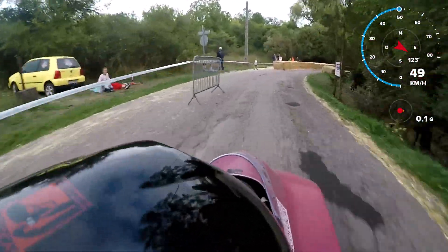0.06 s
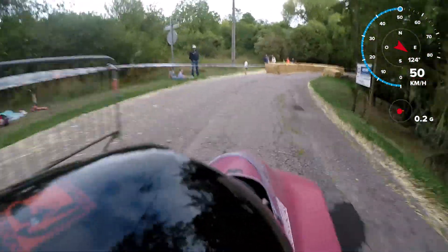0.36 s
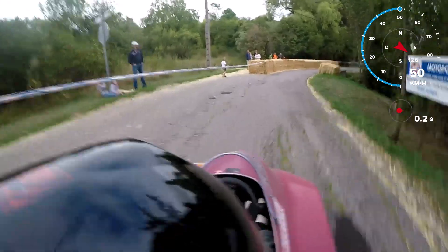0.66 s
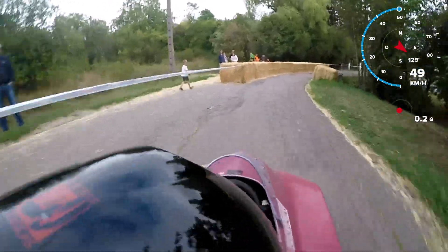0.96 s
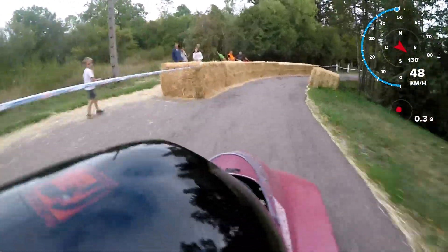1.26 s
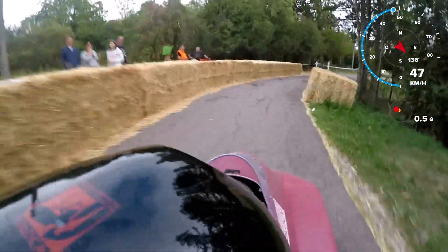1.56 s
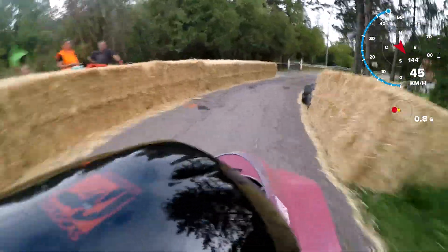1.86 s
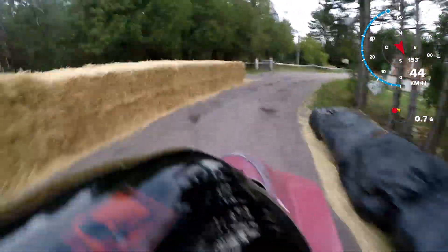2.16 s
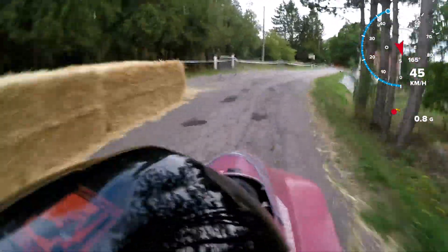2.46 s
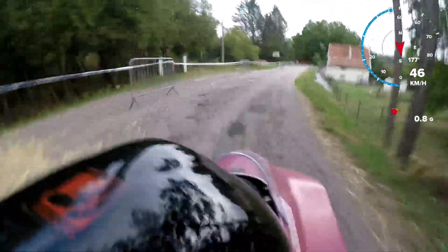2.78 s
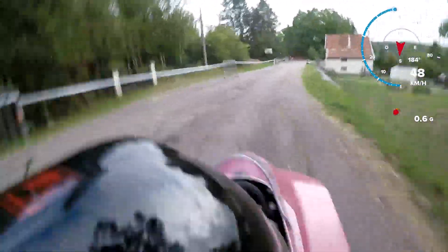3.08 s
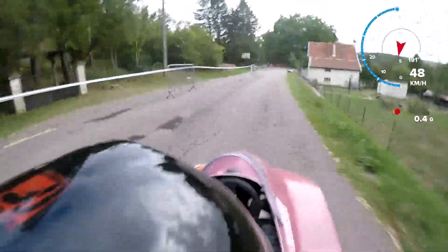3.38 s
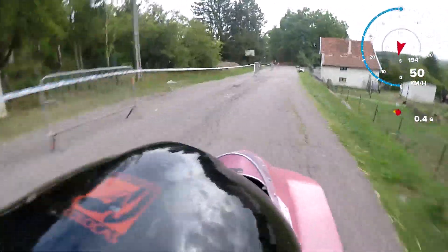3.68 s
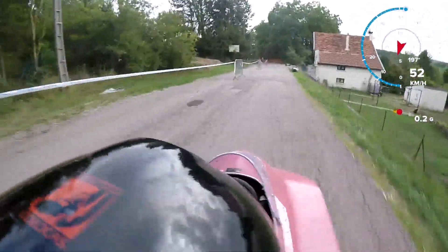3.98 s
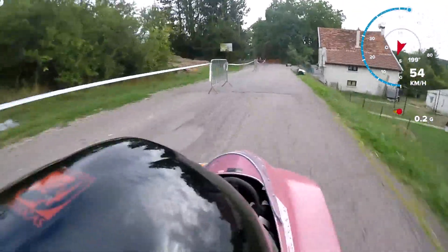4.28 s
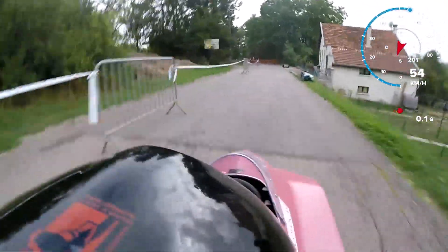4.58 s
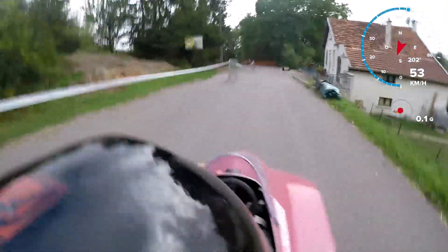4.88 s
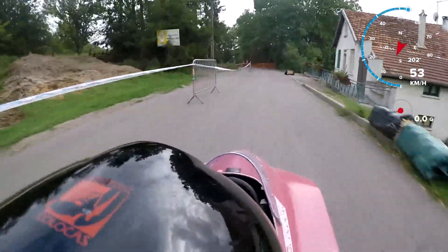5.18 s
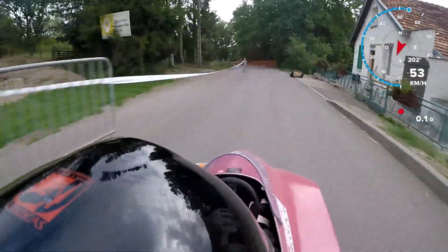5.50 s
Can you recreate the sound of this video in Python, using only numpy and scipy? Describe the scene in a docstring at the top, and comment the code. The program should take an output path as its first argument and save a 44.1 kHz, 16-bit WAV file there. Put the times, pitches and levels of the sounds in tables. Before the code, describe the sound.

Wind buffets a microphone mounted on a soapbox cart coasting fast down an asphalt road. The hollow shell booms and drums throughout, over a softer tyre roar and hiss. A wheel squeals faintly at the start, and grit ticks against the body. Loose joints knock and rattle, busiest in a bend midway, with dull thumps from road seams. The ride then smooths out, with one more hard knock near the end.

```python
"""Wind buffets a microphone on the shell of a soapbox cart coasting on asphalt at about 50 km/h.
The road shakes the hollow shell into a boom and drums its panels; seams thump.
Tyres roar, hiss and flick grit at the shell; a wheel squeals briefly at the start.
Loose chassis joints knock and rattle, most in the bend. A limiter ducks the peaks."""
import sys
import numpy as np
from scipy import signal
from scipy.fft import rfft, irfft, next_fast_len
from scipy.io import wavfile
from scipy.ndimage import uniform_filter1d, minimum_filter1d

SR = 44100
rng = np.random.default_rng(int(sys.argv[2]) if len(sys.argv) > 2 else 0)


def digitize_waveform(pressure):
    """Quantize a signal to 16-bit integers and store it at the path in sys.argv[1].

    Rows of a 2-D input are taken as channels; values are limited to [-1, 1].
    """
    field = np.atleast_2d(pressure).T
    bounded = np.clip(field, -1, 1)
    quanta = np.round(bounded * 32767).astype(np.int16)
    wavfile.write(sys.argv[1], SR, quanta)


N = 253134
TIME = np.arange(N) / SR

# cart speed, lowest in the bend: [t/s, v/(km/h)]
SPEED_KMH = [(0, 49), (.75, 50), (1.25, 48), (2.25, 44), (3.25, 48), (4.2, 53), (5.74, 53)]
# side load through the bend: [t/s, load/g]
SIDE_LOAD_G = [(0, .1), (1.25, .2), (1.75, .7), (2.75, .8), (3.25, .5), (4.0, .2), (5.74, .1)]
# tyre noise as the asphalt's coarseness varies: [t/s, roar/dB, hiss/dB]
ASPHALT = [(0.0, -49, -62), (0.46, -40.5, -58.5), (1.02, -44.5, -59.5), (2.05, -42.5, -55),
           (2.36, -48, -57), (2.64, -40.5, -51.5), (2.81, -48, -58), (3.07, -49, -61), (3.39, -47, -58.5),
           (3.87, -51, -60.5), (4.17, -45.5, -58), (4.81, -44, -57), (5.04, -47, -58.5), (5.74, -48.5, -59)]
# tread roar spectrum: [f/Hz, relative density/dB]
TREAD_SPECTRUM = [(400, -2), (900, 8.5), (1400, 5.5), (1850, 2.5), (2200, 1.5), (2600, -7), (3300, -10.5),
                  (4200, -17.5), (7000, -48.5)]
# tyre hiss spectrum: [f/Hz, relative density/dB]
HISS_SPECTRUM = [(2000, 3), (3300, 6.5), (4300, 2), (5400, 3), (6500, 2), (7600, -8.5), (9600, -13),
                 (11000, -26), (15000, -39)]
# largest stones hitting the shell: [t/s, relative peak/dB]
STONE_HITS = [(0.2753, -43), (0.3078, -36.5), (0.3361, -45), (0.374, -50), (0.398, -38), (0.4595, -45),
              (0.528, -40), (0.5586, -48), (0.5915, -41), (0.74, -38.5), (0.7866, -33), (0.827, -39),
              (0.9827, -48), (1.2645, -41), (1.3972, -42), (1.431, -41), (1.5758, -48), (1.6442, -38),
              (1.6905, -43), (1.7315, -41), (1.7474, -35), (1.9749, -41), (2.0058, -43), (2.0115, -40),
              (2.0495, -34), (2.073, -42), (2.1162, -41), (2.1237, -37), (2.154, -35.5), (2.2235, -36),
              (2.4302, -38), (2.4646, -37), (2.4783, -31), (2.5511, -41), (2.6304, -43), (2.6592, -40),
              (2.672, -38), (2.755, -42), (2.7625, -35), (2.8078, -38), (2.8978, -44), (3.1075, -37),
              (3.1555, -40), (3.262, -35), (3.2844, -45), (3.3233, -43), (3.3525, -39), (4.4487, -38.5),
              (4.8703, -34), (4.873, -45)]
# stones scraping a wheel arch: [t/s, peak/dB, decay/s]
ARCH_SCRAPES = [(2.1765, -46.5, 0.0074), (2.729, -39.5, 0.016)]
# spells of harder joint chatter: [centre/s, length/s, boost/dB]
RATTLE_SPELLS = [(.85, 0.14, 11), (1.2, 0.12, 8.5), (1.4, 0.11, 7), (1.7, 0.28, 4), (2.18, 0.22, 7.5),
                 (2.56, .14, 3), (2.7, 0.13, 10), (3.29, 0.12, 6.5)]
# joint knocks: [t/s, ring peak/dB, f/Hz, crack re ring/dB, contact/s]
JOINT_KNOCKS = [(0.035, -32.5, 1770, -27.5, .0005), (0.4912, -27.5, 1760, -29, 0.004),
                (0.656, -31, 1740, -15, .001), (0.794, -19, 1840, -26, 0.0022),
                (0.8337, -33, 1800, -22, .002), (1.145, -34, 1880, -17, 0.0017),
                (1.201, -31, 1740, -25, .002), (1.3313, -27.5, 1580, -29, .001),
                (1.5959, -26, 1780, -30, .001), (1.7405, -21.5, 1759, -18, 0.0064),
                (2.0574, -15.5, 1800, -14.5, 0.0024), (2.065, -31, 1460, -22, .002),
                (2.0805, -26, 1620, -17, .002), (2.104, -26, 1670, -17, .001),
                (2.1123, -21, 1530, -22, .001), (2.1365, -27, 1910, -9, .001),
                (2.1573, -20, 1670, -24, .005), (2.1865, -32, 1670, -23, 0.0018),
                (2.4272, -26, 1697, -14, 0.0042), (2.4773, -21, 1717, -19, 0.0035),
                (2.519, -33, 1780, -13, .002), (2.549, -26, 1820, -13, 0.0017),
                (2.604, -27, 1762, -17, .003), (2.6216, -31, 1800, -21, .002),
                (2.6315, -23.5, 1648, -14, 0.0018), (2.6393, -26, 1730, -16, 0.00089),
                (2.686, -29, 1810, -20, .003), (2.7437, -19.5, 1740, -28, 0.0034),
                (3.099, -23.5, 1700, -30, .002), (3.1058, -24, 1810, -25, 0.0029),
                (3.508, -31, 1680, -38, 0.0018), (4.865, -21.5, 1449, -24, 0.0019),
                (4.8694, -12.5, 1685, -19.5, 0.003), (4.8782, -31, 1742, -21, .001),
                (4.8955, -31, 1650, -20, .002), (4.951, -30, 1540, -25, .002),
                (5.0245, -24.5, 1450, -42, .002), (5.322, -32, 1708, -28, .001)]
# chassis modes: [f/knock f, relative level/dB, t60/s]
CHASSIS_MODES = [(0.5, -9, 0.019), (0.76, -5, 0.0091), (0.999, 1, 0.016), (1.14, -8.5, 0.022),
                 (1.42, -22.5, 0.011), (1.899, -21.5, 0.008)]
# wheels crossing seams: [t/s, relative peak/dB]
SEAM_HITS = [(1.2, -20), (1.334, -23), (2.112, -18.5), (2.602, -38), (2.631, -18.5), (3.103, -20.5),
             (3.532, -26), (4.868, -24)]
# shell boom pitch, wavering irregularly between about 80 and 135 Hz: [t/s, f/Hz]
BOOM_PITCH_HZ = [(0, 105.5), (.45, 91.7), (.7, 116.9), (1.0, 91.6), (1.35, 94.3), (1.52, 118),
                 (1.75, 106.7), (1.95, 113), (2.1, 98), (2.4, 113.2), (2.52, 104), (3.0, 104.5),
                 (3.3, 117.7), (3.48, 97.5), (3.72, 134), (3.88, 106), (4.2, 86.67), (4.8, 100.3),
                 (5.05, 82), (5.6, 120.9)]
# shell panel modes: [f/Hz, width/Hz, relative level/dB]
PANEL_MODES = [(153.5, 28, 3.5), (186.6, 13, 5), (236, 29, 4.5), (297.7, 35, -4.5), (434, 130, -18),
               (776, 19, -17)]
# uneven stretches of road: [centre/s, length/s, boom/dB, panels/dB]
ROUGH_PATCHES = [(0.45, 0.55, 2, 2.5), (1.35, 0.4, 0, 5.5), (1.72, 0.23, 2, 6.5), (2.02, 0.2, 3, 1),
                 (2.15, 0.2, 1.5, 3), (2.5, 0.14, 3, 5.5), (2.61, 0.092, 3.5, 7.5), (3.26, 0.11, 1.5, 4),
                 (3.66, 0.33, -3, 4), (3.83, 0.13, 2, -4), (4.02, 0.26, -2.5, 4), (4.875, 0.19, 5, 1.5)]
# strongest eddies on the microphone: [t/s, peak/dB]
EDDY_SLAPS = [(0.015, -23), (0.091, -19), (0.1416, -19), (0.19, -21), (0.2279, -22), (0.3387, -24),
              (0.437, -19), (0.6026, -22.5), (0.7403, -21.5), (0.7955, -37), (0.9322, -21), (1.19, -26),
              (1.4472, -24.5), (1.462, -24), (1.7261, -21.5), (2.0493, -21), (2.6315, -27), (3.0, -30),
              (3.8552, -22.5), (4.209, -33), (4.38, -18), (4.4194, -27), (4.4281, -17.5), (4.8082, -17.5),
              (5.219, -25), (5.2397, -19), (5.4208, -24), (5.513, -27), (5.5684, -22), (5.598, -20)]
# gusts and slack moments: [centre/s, length/s, buffet/dB, rush/dB]
GUST_SWELLS = [(.18, 0.43, 2, 2.5), (.63, 0.082, -1, -8), (0.775, 0.45, 3, 1.5), (1.1, 0.079, -3, -6),
               (1.42, 0.16, 0, 4), (1.6, 0.12, 7, -4.5), (1.85, 0.16, 0.5, -3), (2.07, 0.43, -2, 5.5),
               (2.19, 0.26, 3.5, 1.5), (2.6, .6, 0, 0.5), (3.1, .45, -4.5, 1.5), (3.36, 0.11, 1.5, 10),
               (3.56, 0.24, -5.5, 0.5), (3.97, 0.088, -2, 2.5), (4.38, 0.24, 3.5, 3.5),
               (4.65, 0.36, 3, 0.5), (5.0, 0.28, 3, -4), (5.47, 0.7, -0.5, 2)]
# large-eddy spectrum: [f/Hz, relative density/dB]
BUFFET_SPECTRUM = [(12, -12.5), (22, -17), (32, 6.5), (45, -7.5), (66, 3), (92, -8.5), (160, -14.5),
                   (320, -35.5)]
# small-eddy spectrum: [f/Hz, relative density/dB]
RUSH_SPECTRUM = [(60, -14.5), (150, 7), (290, 2.5), (400, -3), (650, -7.5), (1000, -17), (1600, -22.5),
                 (2500, -32), (4000, -42.5), (6300, -58), (9000, -80.5)]


def from_db(db):
    """Decibels to gain."""
    return 10 ** (np.asarray(db) / 20)


def unit_rms(x):
    """Scale to rms 1."""
    return x / np.sqrt(np.mean(x ** 2) + 1e-20)


def curve(rows, column=1):
    """One column, interpolated linearly over time."""
    table = np.transpose(rows)
    return np.interp(TIME, table[0], table[column])


def swells_db(rows):
    """Raised-cosine swells; one curve per dB column."""
    return sum(np.outer(dbs, np.cos(np.pi * np.clip((TIME - centre_s) / length_s, -.5, .5)) ** 2)
               for centre_s, length_s, *dbs in rows)


def coarseness_db():
    """Asphalt roar level about its mean."""
    roar_db = curve(ASPHALT)
    return roar_db - roar_db.mean()


def white():
    """White noise."""
    return rng.standard_normal(N)


def burst(t, decay_s):
    """Exponentially decaying noise."""
    return rng.standard_normal(len(t)) * np.exp(-t / decay_s)


def drift(rate_hz):
    """Slow random curve, rms 1."""
    step, warmup = 20, 2000
    pole = np.exp(-2 * np.pi * rate_hz * step / SR)
    noise = rng.standard_normal(N // step + warmup + 2)
    slow = signal.lfilter([1], [1, -2 * pole, pole * pole], noise)[warmup:]
    return np.interp(np.arange(N) / step, np.arange(len(slow)), unit_rms(slow))


def grains(per_s, spread_db):
    """Random clicks, mostly small."""
    sizes = from_db(spread_db * np.minimum(rng.exponential(1, N), 4))
    return (rng.random(N) < per_s / SR) * sizes * rng.choice([-1, 1], N)


def band(x, low_hz, high_hz):
    """Butterworth band-pass."""
    return signal.sosfilt(signal.butter(2, [low_hz, high_hz], "band", fs=SR, output="sos"), x)


def muffled(x, edge_hz=9500):
    """Steep low-pass."""
    return signal.sosfilt(signal.butter(10, edge_hz, fs=SR, output="sos"), x)


def resonance(x, hz, width_hz):
    """Two-pole resonator, peak gain 1."""
    r = np.exp(-np.pi * width_hz / SR)
    feedback = [1, -2 * r * np.cos(2 * np.pi * hz / SR), r * r]
    return signal.lfilter(np.array([1, 0, -1]) * (1 - r * r) / 2, feedback, x + 1e-18)


def coloured(x, spectrum):
    """Impose a spectrum, rolled off past its ends; rms 1."""
    hz, db = np.transpose(spectrum)
    size = next_fast_len(N + SR // 2)
    bins_hz = np.maximum(np.arange(size // 2 + 1) * SR / size, 1)
    skirts = np.minimum(bins_hz / hz[0], 1) * np.minimum(hz[-1] / bins_hz, 1) ** 2
    shape = from_db(np.interp(np.log(bins_hz), np.log(hz), db))
    return unit_rms(irfft(rfft(x, size) * skirts * shape, size)[:N])


def steadied(x, span_s):
    """Level out swells slower than the span; rms about 1."""
    size = int(span_s * SR)
    return x / np.sqrt(uniform_filter1d(uniform_filter1d(x * x, size), size) + 1e-12)


def add(track, at_s, sound, peak_db):
    """Mix in a short sound at a given peak."""
    start = round(at_s * SR)
    track[start:start + len(sound)] += (from_db(peak_db) * sound / np.abs(sound).max())[:N - start]


def squeal(level_db=-56.5, hold_s=0.2, release_db_per_s=597, upper_hz=3265, lower_hz=3020):
    """Something rubs a wheel: a rough, wavering note over a weaker, lower one."""
    def note(hz, waver_hz=30):
        roughness = 1 + drift(110)
        phase = 2 * np.pi * np.cumsum(hz + waver_hz * drift(30)) / SR
        return steadied(roughness * np.sin(phase), span_s=0.033)

    gain = from_db(level_db - release_db_per_s * np.clip(TIME - hold_s, 0, 1))
    return gain * (note(upper_hz) + from_db(-6) * note(lower_hz))


def clink(at_s=3.374, peak_db=-33, hz=3800):
    """A small metal part taps once."""
    out, t = np.zeros(N), TIME[:SR // 20]
    ring = resonance(burst(t, decay_s=0.003), hz, width_hz=900)
    add(out, at_s, band(ring, 2305, 5970), peak_db)
    return out


def skitters():
    """Stones caught by a tyre scrape the arch with a bright chirr."""
    out, t = np.zeros(N), TIME[:SR // 10]
    for at_s, peak_db, decay_s in ARCH_SCRAPES:
        scrape = resonance(burst(t, decay_s), hz=6900, width_hz=1200)
        add(out, at_s, muffled(band(scrape, 4500, 12000)), peak_db)
    return out


def grit(pebbles_per_s=14, fresh_asphalt_s=4.5, tick_hz=5550, scatter_hz=400):
    """Grit and stones tick on the shell; on fresh asphalt the spray drops and random pebbles stop."""
    load_g, fresh = curve(SIDE_LOAD_G), TIME > fresh_asphalt_s
    spray = resonance(grains(per_s=120, spread_db=4.5), hz=5400, width_hz=1800)
    spray_db = curve(ASPHALT, column=2) - 12.5 + load_g - 9 * fresh
    out = from_db(spray_db) * unit_rms(muffled(band(spray, 4200, 8200)))
    flicked = (rng.random(N) < pebbles_per_s / SR) & ~fresh
    pebble_db = -52.5 + 4 * load_g + 0.55 * coarseness_db() + rng.uniform(-1.1, 1, N)
    for at_s, level_db in [*STONE_HITS, *zip(TIME[flicked], pebble_db[flicked])]:
        contact = burst(TIME[:SR // 20], decay_s=0.0009)
        ring = resonance(contact, rng.normal(tick_hz, scatter_hz), width_hz=1300)
        tick = band(ring + 0.23 * contact, 2300, 6900)
        add(out, at_s, muffled(tick), level_db - 1)
    return out


def tyres(judder_db=0.78, hiss_db_per_g=-0.5):
    """Tread roars and hisses as the wheels judder; side load trims the hiss slightly."""
    judder = from_db(judder_db * drift(39))
    roar = coloured(white() * judder, TREAD_SPECTRUM)
    hiss = coloured(white() * judder, HISS_SPECTRUM)
    roar_db = curve(ASPHALT) - 0.5
    hiss_db = curve(ASPHALT, column=2) + 1.6 + hiss_db_per_g * curve(SIDE_LOAD_G)
    return from_db(roar_db) * roar + from_db(hiss_db) * hiss


def rattle(db_per_g=4.5, modes_hz=(1730, 1900, 2060)):
    """The road keeps loose joints chattering, more under side load."""
    chatter = sum(resonance(grains(per_s=70, spread_db=0.7), hz, width_hz=260) for hz in modes_hz)
    level_db = curve(ASPHALT) - 10.5 + db_per_g * curve(SIDE_LOAD_G) + swells_db(RATTLE_SPELLS)[0]
    return from_db(level_db) * unit_rms(band(chatter, 1450, 2250))


def rebounds(threshold_db=-20, re_knock_db=-25.5, decay_s=0.042):
    """Joints rebound after a hard knock in a quick, dying rattle."""
    def chatter(*modes_hz):
        return sum(resonance(grains(per_s=99, spread_db=2), hz, width_hz=300) for hz in modes_hz)

    envelope = sum(from_db(db + re_knock_db) * (TIME > at_s) * np.exp(-np.abs(TIME - at_s) / decay_s)
                   for at_s, db, *_ in JOINT_KNOCKS if db > threshold_db)
    joints = chatter(1300, 1680, 2050) + from_db(-8) * chatter(2450, 3200)
    return envelope * unit_rms(band(joints, 1000, 3600))


def knocks(seat_s=0.00014, scatter_db=0.94):
    """A loose joint seats with a grate and a crack; its ring holds during contact, then dies."""
    out, t = np.zeros(N), TIME[:SR // 10]
    for at_s, peak_db, hz, crack_db, contact_s in JOINT_KNOCKS:
        released_s = np.maximum(t - contact_s, 0)
        ring = np.zeros(len(t))
        for ratio, mode_db, t60_s in CHASSIS_MODES:
            envelope = from_db(rng.normal(mode_db, scatter_db) - 60 * released_s / t60_s)
            ring += envelope * np.sin(2 * np.pi * (hz * ratio * t + rng.random()))
        grate = unit_rms(band(rng.standard_normal(len(t)), 700, 2200)) * np.exp(-t / 0.006)
        attack = (1 - np.exp(-t / seat_s)) ** 2
        add(out, at_s, (ring + 0.29 * grate) * attack, peak_db)
        crack = band(burst(t, decay_s=0.0037), 3300, 6500)
        add(out, at_s, muffled(band(crack, 2200, 8100)), peak_db + crack_db)
    return out


def seams(gain_db=3):
    """Wheels thump dully over road seams."""
    out, t = np.zeros(N), TIME[:SR // 10]
    for at_s, level_db in SEAM_HITS:
        add(out, at_s, band(burst(t, decay_s=0.02), 130, 420), level_db + gain_db)
    return out


def shell(wander_hz=4, jolt_hz=24, steady_above_g=0.45, steady_per_g=2.7):
    """The rough road keeps the hollow shell booming and its panels drumming."""
    load_g = curve(SIDE_LOAD_G)
    patch_boom_db, patch_panel_db = swells_db(ROUGH_PATCHES)
    boom_db = -23 + patch_boom_db + 0.1 * coarseness_db() + 2 * load_g
    panel_db = -31 + patch_panel_db + 0.55 * coarseness_db() + 2 * drift(7)
    phase = 2 * np.pi * np.cumsum(curve(BOOM_PITCH_HZ) + wander_hz * drift(8.1)) / SR
    # jolts scatter amplitude and phase; side load holds a steadier hum
    hum = steady_per_g * np.maximum(load_g - steady_above_g, 0)
    swing = (hum + drift(jolt_hz)) * np.cos(phase) + drift(jolt_hz) * np.sin(phase)
    boom = steadied(swing, span_s=0.035)
    modes = sum(from_db(db) * resonance(white(), hz, width_hz) for hz, width_hz, db in PANEL_MODES)
    panels = steadied(band(modes, 130, 800), span_s=0.18)
    return from_db(boom_db) * boom + from_db(panel_db) * panels


def slaps(centre_hz=680, attack_s=0.0003, decay_s=0.0015):
    """Single eddies break on the microphone: dull pops of about two cycles."""
    out, t = np.zeros(N), TIME[:SR // 20]
    envelope = (1 - np.exp(-t / attack_s)) * np.exp(-t / decay_s)
    for at_s, peak_db in EDDY_SLAPS:
        hz = centre_hz * np.exp(0.14 * rng.standard_normal())
        add(out, at_s, np.sin(2 * np.pi * hz * t) * envelope, peak_db)
    return out


def wind(cruise_kmh=50, rush_db_per_kmh=0.33, lull_start_s=2.74, lull_end_s=3.544, lull_fade_s=0.19):
    """Large eddies buffet the microphone; small ones ride on them in bursts of rush."""
    buffet = steadied(coloured(white(), BUFFET_SPECTRUM), span_s=0.12)
    bursts_db = np.minimum(4 * drift(70) + buffet, 4)
    rush = steadied(coloured(white() * from_db(bursts_db), RUSH_SPECTRUM), span_s=0.093)
    rush /= np.std(band(rush, 340, 1100))  # level refers to the midrange
    gust_buffet_db, gust_rush_db = swells_db(GUST_SWELLS)
    speed_db = rush_db_per_kmh * (curve(SPEED_KMH) - cruise_kmh)
    # the rush dips on leaving the bend
    lull = np.clip(np.minimum(TIME - lull_start_s, lull_end_s - TIME) / lull_fade_s, 0, 1)
    rush_db = -34 + speed_db + gust_rush_db - 10 * lull + 0.7 * drift(6)
    return from_db(-23 + gust_buffet_db) * buffet + from_db(rush_db) * rush


def scene():
    """Mono sum; all sources close, in open air."""
    air = wind() + slaps()
    road = shell() + seams() + tyres()
    chassis = rattle() + knocks() + rebounds() + clink()
    wheels = squeal() + grit() + skitters()
    return (air + road + chassis + wheels)[None]


def record(dry, ceiling_db=-8.1, release_db_per_s=300, cutoff_hz=13500, fade_in_s=0.004):
    """Look-ahead limiter, fade-in, low-pass."""
    over_db = np.maximum(20 * np.log10(np.abs(dry[0]) + 1e-9) - ceiling_db, 0)
    release_db = release_db_per_s * TIME
    held_db = np.maximum.accumulate(over_db + release_db) - release_db
    duck_db = uniform_filter1d(minimum_filter1d(-held_db, size=129), size=129)
    fade_in = np.minimum(TIME / fade_in_s, 1)
    low_pass = signal.cheby2(12, 70, cutoff_hz, fs=SR, output="sos")
    return signal.sosfilt(low_pass, dry * from_db(duck_db) * fade_in)


dry = scene()
out = record(dry)
digitize_waveform(out)
```